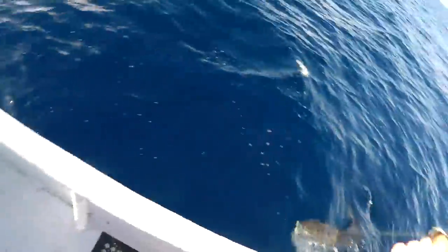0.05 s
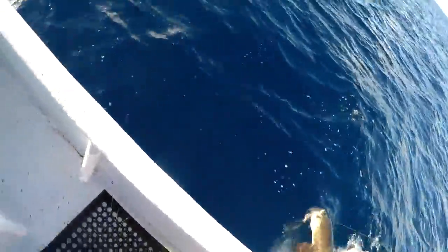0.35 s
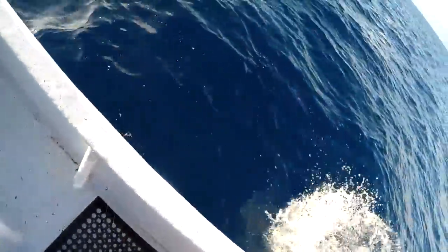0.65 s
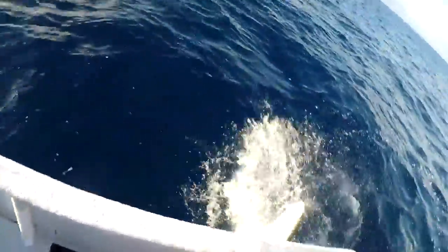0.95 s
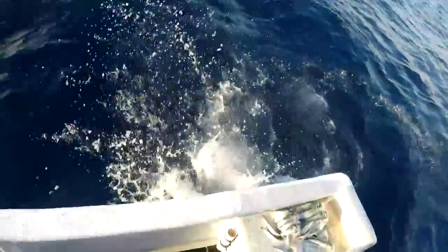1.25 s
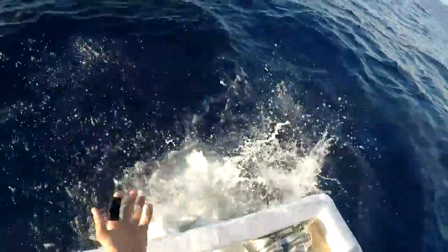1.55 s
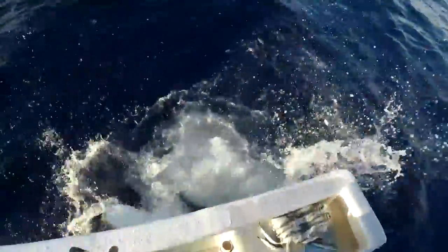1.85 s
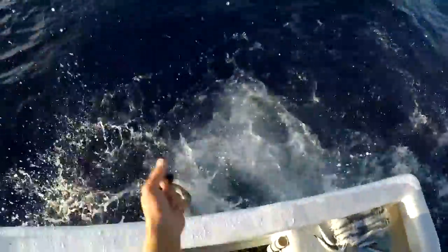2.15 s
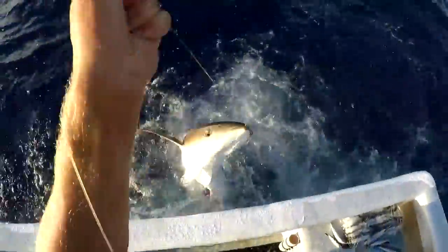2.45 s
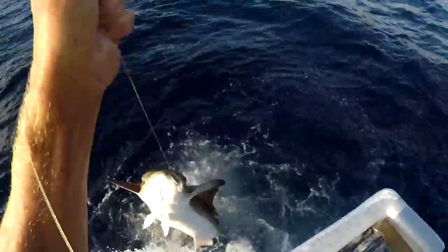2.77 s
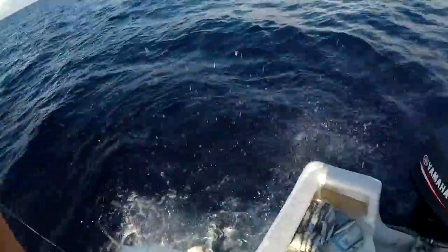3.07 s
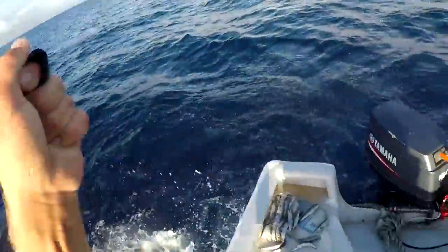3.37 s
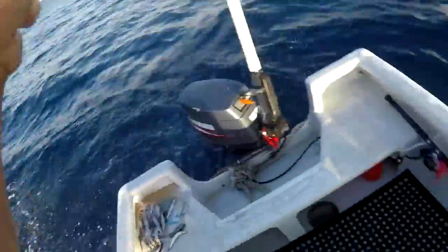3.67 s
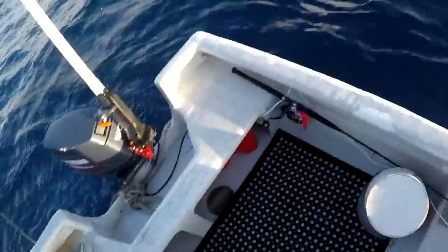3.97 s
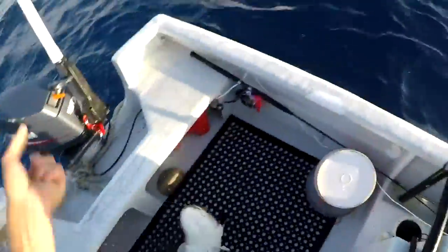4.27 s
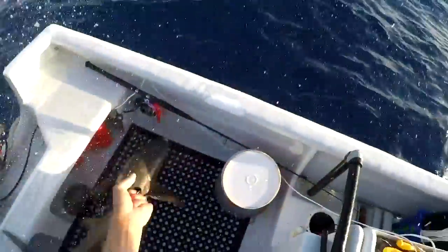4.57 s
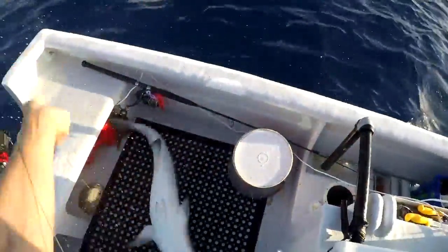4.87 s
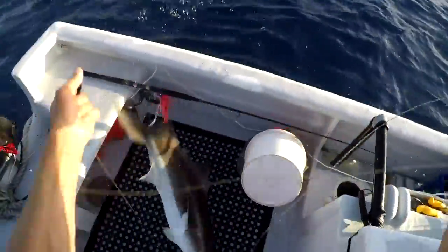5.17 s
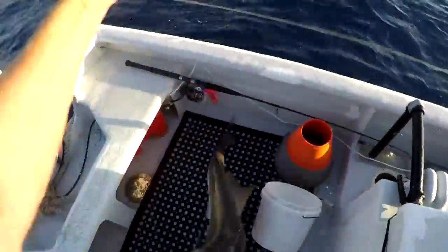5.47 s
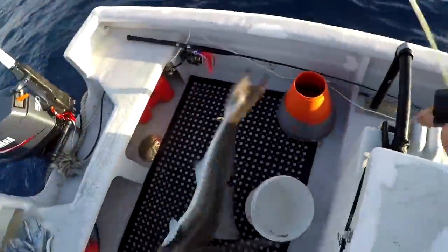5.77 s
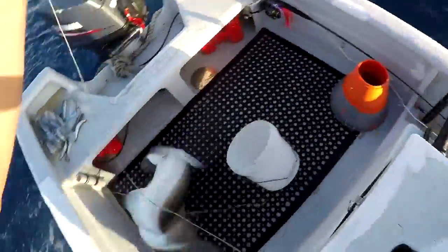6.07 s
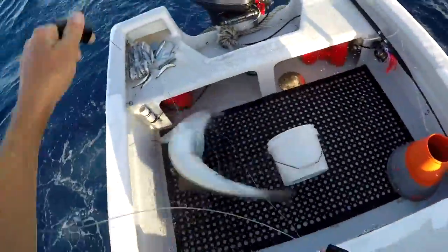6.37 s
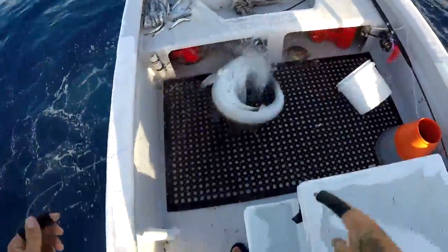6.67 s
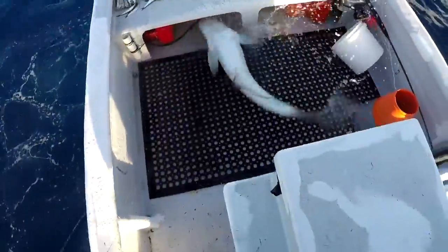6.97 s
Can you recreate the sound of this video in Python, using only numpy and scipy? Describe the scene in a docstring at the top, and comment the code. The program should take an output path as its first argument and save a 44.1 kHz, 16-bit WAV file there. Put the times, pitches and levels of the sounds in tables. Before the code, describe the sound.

Water splashes beside a boat, then a small shark thrashes on deck with wet slaps and hollow thumps as wind buffets the microphone.

```python
"""A small shark on a hand line thrashes the sea white beside a drifting boat: foam sloshes, spray rains
back. About four seconds in it is swung over the side and beats its wet body and tail on the rubber mat,
booming the hollow deck. It knocks a plastic bucket over, its skin drags and squeaks, and the heaviest
blow lands near the end. All of it is heard from inside a ringing waterproof camera case, with wind and
movement buffeting the microphone throughout."""
import sys
import numpy as np
from scipy import signal
from scipy.fft import rfft, irfft, next_fast_len
from scipy.io import wavfile
from scipy.ndimage import uniform_filter1d

SR = 44100
rng = np.random.default_rng(int(sys.argv[2]) if len(sys.argv) > 2 else 0)


def generate_wav(sig):
    """Save sig (samples, or channels by samples) to the path in sys.argv[1] as 16-bit PCM at SR."""
    pcm = np.round(np.clip(np.atleast_2d(sig).T, -1, 1) * 32767).astype(np.int16)
    wavfile.write(sys.argv[1], SR, pcm)


N = 318666
TIME = np.arange(N) / SR

# wet body on water, hull and mat: (time [s], rise [s], base t60 [s], level [dB], brightness [dB/band])
BODY_SLAPS = [(0.287, 0.00073, 0.087, -38, -4.5), (2.69, 0.0089, 0.23, -40, 3),
              (3.094, .005, 0.29, -47.5, 9), (3.262, 0.011, 0.065, -43, 1), (3.299, 0.014, 0.074, -37, 3),
              (3.484, 0.0027, 0.048, -42.5, 5), (3.515, 0.0021, 0.045, -40.5, -0.5),
              (4.172, 0.00082, 0.037, -32, 11.5), (4.2, 0.011, 0.23, -37, 9),
              (4.425, 0.0015, 0.013, -36.5, 8), (4.473, 0.0013, 0.015, -26.5, 2.5),
              (4.484, 0.0019, 0.025, -33, 4), (4.651, 0.019, 0.065, -26.5, 7.5),
              (4.665, 0.0025, 0.088, -28, -1.5), (4.743, 0.0063, 0.11, -28, 2),
              (4.776, 0.012, 0.073, -20.5, 1.5), (4.917, 0.0047, 0.05, -18, 2.5),
              (4.935, 0.011, 0.16, -18, 0), (5.034, 0.0084, 0.24, -21, -1.5),
              (5.062, 0.011, 0.097, -23.5, -8), (5.175, 0.017, 0.099, -20, 1.5),
              (5.238, 0.0046, 0.088, -26, -1.5), (5.301, 0.0012, 0.19, -34, 4),
              (5.354, 0.017, 0.073, -28, 9.5), (5.456, 0.0034, 0.1, -24, 2.5),
              (5.639, 0.009, 0.088, -19.5, 2), (5.725, 0.013, 0.13, -23, 1),
              (5.763, 0.0034, 0.082, -33, -4.5), (5.789, 0.0036, 0.06, -32.5, 2),
              (5.860, 0.0033, 0.15, -35, 4.5), (6.1175, 0.003, 0.096, -23.5, -8),
              (6.195, 0.011, 0.078, -38, -6.5), (6.272, .003, 0.79, -31, 2),
              (6.314, 0.0051, 0.12, -18, 0.5), (6.438, 0.01, 0.32, -26, 0),
              (6.597, 0.011, 0.16, -31.5, 3.5), (6.644, 0.0037, 0.29, -25.5, 2.5),
              (6.72, 0.007, 0.071, -27.5, -4.5), (6.873, 0.0047, 0.074, -29, 4),
              (6.934, 0.0061, 0.076, -19.5, 0), (7.023, 0.0095, 0.1, -32.5, 6),
              (7.054, 0.00076, 0.037, -22, -4.5), (7.071, 0.004, 0.1, -19, 1)]
# dull thumps of water and body on the boat: (time [s], rise [s], base t60 [s], level [dB])
HULL_THUMPS = [(0.068, 0.026, 0.031, -49.5), (0.802, 0.0038, 0.069, -44.5), (1.111, 0.0085, 0.048, -45),
               (1.600, 0.014, 0.1, -39), (1.667, 0.0021, 0.033, -41), (2.016, 0.0043, 0.47, -42.5),
               (3.728, 0.0098, 0.44, -49.5), (3.863, 0.0083, 0.36, -46.5), (4.132, 0.022, 0.15, -40),
               (4.178, .001, 0.28, -37.5), (4.212, 0.0078, 0.16, -36), (4.268, 0.0015, 0.072, -35.5),
               (4.875, .005, 0.022, -44), (5.139, .006, 0.039, -41), (5.888, .002, .04, -46),
               (6.008, 0.0024, 0.036, -45), (7.037, 0.0018, 0.026, -38)]
# rough skin dragging over gunwale and mat: (time [s], length [s], level [dB])
SKIN_SLIDES = [(2.824, 0.11, -47), (4.279, 0.09, -35), (5.385, 0.055, -30.5), (5.485, 0.04, -32.5),
               (5.595, 0.08, -36.5), (6.477, 0.045, -32), (6.9, 0.079, -34), (7.185, .06, -27)]
# band mix of each kind of contact: (thud [dB], smack [dB], splat [dB], spray [dB])
SLAP_MIX = [-13.5, -3.5, -1, -13.5]
THUMP_MIX = [7.5, 2, -19, -19]
SLIDE_MIX = [-7.5, -6.5, -3.5, -11.5]
def contact_powers(t60_scales=(1.15, 1.0, .95, .9)):
    """Power envelopes of slaps, thumps and slides in four bands; brightness tilts about the splat."""
    powers, tilt = np.zeros((4, N)), np.arange(4) - 2
    blows = [(s, rise, t60, db + np.array(SLAP_MIX) + bright * tilt)
             for s, rise, t60, db, bright in BODY_SLAPS]
    blows += [(s, rise, t60, db + np.array(THUMP_MIX)) for s, rise, t60, db in HULL_THUMPS]
    for s, rise, t60, levels_db in blows:
        span, age = window(s, SR // 2)
        for k, db in enumerate(levels_db):
            powers[k, span] += from_db(db) ** 2 * slap_power(age, rise, t60 * t60_scales[k])
    dragging = sum(from_db(db) * swell(s, length, attack=0.013, t60=0.072)
                   for s, length, db in SKIN_SLIDES)
    return powers + np.outer(from_db(SLIDE_MIX), dragging) ** 2


def slap_power(age, rise, t60, snap_t60=0.012, patter_db=-23, patter_t60=0.17):
    """A snap at first contact, a swell as the body lands, a quick decay, then thrown water's patter."""
    since_contact = age - min(rise / 2, .003)
    snap = 0.071 * (since_contact > 0) * from_db(-60 * np.abs(since_contact) / snap_t60) ** 2
    softness = 1 + (rise / 0.0027) ** 2   # slow landings snap less
    attack = np.minimum(age / rise, 1) ** 2
    since_peak = np.maximum(age - rise, 0)
    body = from_db(-60 * since_peak / t60) ** 2
    patter = from_db(patter_db - 60 * since_peak / patter_t60) ** 2
    return attack * (body + patter) + snap / softness


# the five edges around the thud, smack, splat and spray bands: (frequency [Hz])
BAND_EDGES = [400, 900, 2400, 5500, 15000]
# EQ of a wet slap: (frequency [Hz], gain [dB])
SLAP_EQ = [(200, 35.5), (350, 3.5), (600, -10), (1100, -6.5), (2300, -7), (3600, 2.5), (5000, -10.5),
           (6200, -17), (8000, -13), (9500, -22.5), (13000, -27), (15500, -29)]
def slaps(ragged_db=3.5, echo_gain=.35):
    """Skin meets the wet surface patch by patch: a dense burst of tiny cracks, treble dying first."""
    texture = coloured(drops(per_s=5000, spread_db=3.0), SLAP_EQ)
    ragged = from_db(ragged_db * drift(350))
    lag = np.zeros(N, int)   # each slap lands at its own distance from the boat's side
    for (s, *_), echo_s in zip(BODY_SLAPS, rng.uniform(.0006, .0035, len(BODY_SLAPS))):
        lag[int(s * SR):] = int(echo_s * SR)
    texture = texture + echo_gain * texture[np.arange(N) - lag]
    return ragged * sum(np.sqrt(power) * evened(band(texture, *BAND_EDGES[k:k + 2], order=4), size=400)
                        for k, power in enumerate(contact_powers()))


# bright accents in and between the slaps: (time [s], level [dB])
WET_CRACKS = [(4.473, -40), (4.944, -19), (5.042, -17.5), (5.076, -16), (5.647, -15.5), (5.697, -35),
              (5.737, -14.5), (5.765, -25), (6.121, -22.5), (6.290, -20), (6.318, -22), (6.457, -25),
              (6.646, -19.5), (6.726, -35), (7.037, -23.5)]
def cracks(rise_s=0.00061):
    """Trapped water bursts out under the body, or a fin flicks the mat, with a sharp crack."""
    bursts = sum(from_db(db) * swell(s, rise_s, rise_s, t60=0.026) for s, db in WET_CRACKS)
    return bursts * evened(band(rng.standard_normal(N), 1100, 4440), size=200)


# air cupped under some slaps: (time [s], pitch [Hz], level [dB])
AIR_POCKETS = [(.287, 3780, -39), (4.215, 2070, -27), (4.779, 1190, -21.5), (4.939, 1344, -22),
               (4.945, 2934, -17.5), (5.038, 2170, -11.5), (5.068, 1580, -34), (6.121, 1713, -22),
               (6.122, 1110, -21)]
def air_pockets(attack_s=0.002, t60=0.11, sag_octaves_per_s=0.43):
    """A pocket of air under the wet body rings unsteadily, sagging a little as it opens."""
    out, wobble = np.zeros(N), 0.49 * drift(300)
    for s, hz, db in AIR_POCKETS:
        span, age = window(s, SR // 5)
        pitch = hz * 2 ** (-sag_octaves_per_s * age) + 100 * wobble[span]
        envelope = np.minimum(age / attack_s, 1) * from_db(db - 60 * age / t60)
        out[span] += envelope * np.exp(wobble[span]) * sine(pitch)
    return out


# hard, hollow knocks on the boat: (time [s], level [dB], pitch [Hz])
HULL_KNOCKS = [(0.933, -12, 780), (4.143, -12, 640), (4.150, -15, 696), (4.178, -8.5, 880),
               (4.266, -8, 835), (4.273, -9, 610), (5.0007, -11.5, 900), (7.0615, -5, 810)]
def knocks(ring_t60=0.0077, click_db=-11, click_t60=0.0035):
    """A hard contact gives a short click and a few cycles of hollow ring."""
    out = np.zeros(N)
    for s, db, hz in HULL_KNOCKS:
        span, age = window(s, SR // 20)
        noise = band(rng.standard_normal(len(age)), 820, 2500)
        click = noise / rms(noise) * from_db(click_db - 60 * age / click_t60)
        tone = np.sin(2 * np.pi * hz * age) * from_db(-60 * age / ring_t60)
        out[span] += from_db(db) * (tone + click)
    return out


# the body's weight landing on the deck: (time [s], level [dB], panel pitch [Hz])
DECK_HITS = [(4.181, -19.5, 169), (4.186, -21, 114), (4.208, -25.5, 270), (4.228, -25, 335),
             (4.671, -25, 200), (4.744, -33, 500), (4.762, -34, 585), (5.039, -17.5, 170),
             (5.071, -27, 460), (5.074, -20, 151), (5.634, -20, 144), (5.644, -22, 276),
             (5.736, -27.5, 406), (6.124, -24.5, 356), (6.319, -25, 430), (6.321, -18, 224),
             (6.457, -29, 313), (6.511, -23, 303), (6.615, -31, 249), (6.661, -26.5, 246),
             (7.038, -36, 160), (7.064, -13, 108)]
# modes of a deck panel: (pitch [x panel pitch], level [dB], t60 [s])
PANEL_MODES = [(1, 2, 0.11), (1.181, -6, 0.16), (1.57, -4, .06)]
def deck():
    """The hollow deck booms at the pitch of the panel that is hit."""
    return sum(struck([(s, db)], [(hz * ratio, *rest) for ratio, *rest in PANEL_MODES])
               for s, db, hz in DECK_HITS)


# hits on the bucket: (time [s], level [dB])
BUCKET_HITS = [(5.243, -25.5), (6.725, -40)]
# modes of its plastic shell: (pitch [Hz], level [dB], t60 [s])
BUCKET_MODES = [(213, 2.5, 0.25), (1014, 5.5, 0.085), (1147, 3.5, 0.088), (1610, -12, 0.17)]
def bucket():
    """The empty bucket rings as it is knocked over, then swept aside by the tail."""
    return struck(BUCKET_HITS, BUCKET_MODES)


# wet skin on rubber: (time [s], length [s], starting pitch [Hz], level [dB])
SKIN_SQUEAKS = [(5.929, 0.09, 1367, -45), (7.164, 0.044, 2186, -24)]
def squeaks(width_hz=520, octaves_per_s=7.7):
    """Skin sticks and slips unevenly, ever faster as the body pushes off: a hoarse, rising scrape."""
    out = np.zeros(N)
    for s, length, first_hz, db in SKIN_SQUEAKS:
        hz = first_hz * 2 ** (octaves_per_s * np.clip(TIME - s, 0, length))
        grip = evened(band(rng.standard_normal(N), 24, width_hz / 2, order=1), size=2000)
        out += from_db(db) * swell(s, length, attack=0.013, t60=0.045) * grip * sine(hz)
    return out


# faders for churned and running water: (time [s], slosh [dB], fizz [dB])
WATER_FADERS = [(.18, -57, -78), (.24, -56, -55), (.45, -48.5, -52), (.9, -46.5, -44), (2.3, -47, -44),
                (2.85, -53.5, -50.5), (3.1, -54.5, -51.5), (3.45, -52.5, -51.5), (3.7, -52, -65.5),
                (4.35, -53.5, -46), (4.6, -47, -60), (4.88, -49, -45), (5.15, -44, -42), (5.55, -42, -59),
                (5.95, -51, -47), (6.25, -52, -53.5), (6.8, -47.5, -41.5), (7.23, -45, -36.5)]
# fader for the finest spray of the first splash: (time [s], level [dB])
MIST_FADER = [(.3, -81), (.85, -57), (1.1, -71), (2.3, -80), (3.05, -67), (3.7, -79)]
# sheets of spray falling back on the sea: (peak time [s], level [dB])
SPRAY_SURGES = [(.88, -41.5), (1.0, -45), (1.24, -38), (1.61, -37.5), (1.9, -43.5), (2.19, -40.5)]
# EQs of slosh and fizz: (frequency [Hz], gain [dB])
SLOSH_EQ = [(130, 5), (250, 1.5), (450, -0.5), (900, 2), (1700, -0.5), (2500, -2), (4000, -5.5)]
FIZZ_EQ = [(1200, -8), (2200, -13.5), (3600, -1.5), (5000, -9.5), (6700, -18.5), (7800, -12), (9500, -19),
           (13000, -28.5), (15500, -34)]
def water(bubble_db=-8, fizz_trim_db=-2.5, surge_rise_s=0.13, waver_db=1.06):
    """Foam sloshes and bubbles while spray rains back in surges of drops and fizz, mist on top."""
    slosh_db, fizz_db = automation(WATER_FADERS)
    mist_db, = automation(MIST_FADER)
    slosh = coloured(rng.standard_normal(N), SLOSH_EQ)
    slosh += from_db(bubble_db) * bubbles(per_s=490, cycles=20, low_hz=450, high_hz=2760, pitches=18)
    spray = drops(per_s=9000, spread_db=4.0) * from_db(2.5 * drift(140))
    spray += bubbles(per_s=3500, cycles=18, low_hz=2500, high_hz=15000, pitches=30)
    surge_power = sum((from_db(db) * swell(s - surge_rise_s, surge_rise_s, surge_rise_s, t60=0.32)) ** 2
                      for s, db in SPRAY_SURGES)
    fizz_gain = from_db(fizz_trim_db) * np.sqrt(from_db(fizz_db) ** 2 + surge_power)
    fizz = fizz_gain * coloured(spray, FIZZ_EQ)
    mist = band(spray, 7200, 8400)
    mix = from_db(slosh_db) * slosh + fizz + from_db(mist_db) * mist / rms(mist)
    return mix * from_db(waver_db * drift(14))


def bubbles(per_s, cycles, low_hz, high_hz, pitches):
    """Small bubbles ring for some cycles each, at scattered pitches; rms 1."""
    births, pitch_index = drops(per_s, spread_db=4.0), rng.integers(0, pitches, N)
    out = sum(ring(births * (pitch_index == k), hz, cycles / hz)
              for k, hz in enumerate(np.geomspace(low_hz, high_hz, pitches)))
    return out / rms(out)


# low thumps from wind, handling and blows on the boat: (time [s], level [dB], pitch dive depth [Hz])
DIVING_THUMPS = [(.097, -15, 330), (.456, -11.5, 380), (0.531, -18.5, 343), (0.565, -21.5, 360),
                 (0.66, -14.5, 342), (0.737, -14, 317), (0.858, -16, 280), (0.932, -13.5, 330),
                 (1.047, -21.5, 300), (1.256, -21.5, 250), (1.75, -15, 420), (1.769, -15.5, 383),
                 (1.827, -19, 322), (2.388, -13, 480), (2.777, -16, 390), (2.919, -21, 310),
                 (2.993, -22, 330), (3.184, -20, 383), (3.302, -20.5, 418), (3.63, -18, 525),
                 (3.774, -23, 370), (4.034, -16, 500), (4.149, -10, 397), (4.178, -11, 466),
                 (4.229, -12, 500), (4.275, -14, 420), (4.361, -16, 480), (4.479, -17.5, 480),
                 (4.587, -16.5, 517), (4.999, -6.5, 686), (5.372, -13.5, 450), (5.488, -22, 500),
                 (6.829, -8.5, 600), (7.039, -6.5, 250), (7.06, 3.5, 830), (7.091, -9, 483)]
def diving_thumps(swing_db=8.5, dive_s=0.0071, rise_s=0.0046, cycles=3.38, snap_db=-16, snap_t60=0.026):
    """A low thump dives in pitch, grows and dies in a few cycles; high-starting ones snap at the core."""
    swings, snaps = np.zeros((2, N))
    ragged = np.exp(0.53 * drift(700))
    for s, db, dive_hz in DIVING_THUMPS:
        span, age = window(s, SR // 10)
        floor_hz = 42.6 + 0.059 * dive_hz
        hz = floor_hz + dive_hz * ragged[span] / (1 + age / dive_s) ** 3
        tilt_db = -5.5 * np.log2(hz / floor_hz)   # the swing grows as it slows
        decay_db = -60 * age * floor_hz / cycles
        attack = np.sqrt(np.minimum(age / rise_s, 1))
        swings[span] -= from_db(db + swing_db + tilt_db + decay_db) * attack * sine(hz)
        from_snap = np.abs(age - 0.0035)   # the dull snap peaks just after the onset
        snaps[span] += from_db(db + snap_db - 60 * from_snap / snap_t60) * dive_hz / 1090
    return swings + snaps * evened(band(rng.standard_normal(N), 516, 1090), size=150)


# fader for the breeze's rumble between gusts: (time [s], level [dB])
BREEZE_FADER = [(0, -17.5), (.35, -23.5), (.6, -15), (1.15, -26.5), (2.3, -27.5), (2.65, -27.5),
                (3.25, -18), (3.7, -22), (4.1, -16.5), (4.8, -21.5), (5.3, -34), (5.8, -23), (6.25, -29.5)]
# gusts of rumble: (peak time [s], width [s], level [dB])
WIND_GUSTS = [(0.941, 0.018, -9.5), (1.37, 0.33, -18), (1.731, 0.19, -20), (2.074, 0.14, -13),
              (2.38, 0.088, -20), (2.792, 0.036, -15.5), (2.95, 0.05, -18.5), (3.545, 0.065, -9.5),
              (4.169, 0.045, -9), (4.999, 0.054, -15), (5.074, 0.097, -14.5), (5.388, 0.53, -16),
              (5.662, 0.05, -11), (5.991, 0.097, -15.5), (7.083, 0.051, -13.5), (7.22, 0.056, -21)]
# fader for the low flutter of wind and of the body moving on deck: (time [s], level [dB])
FLUTTER_FADER = [(0, -35), (.3, -56), (.55, -38), (1.1, -50), (1.45, -41.5), (2.05, -40), (2.25, -51),
                 (2.6, -46), (3.2, -47), (3.95, -32), (4.3, -43), (4.55, -33), (5.3, -32.5), (5.7, -29),
                 (6.1, -41.5), (6.35, -37), (7.23, -34.5)]
# EQ of wind on the case: (frequency [Hz], gain [dB])
WIND_EQ = [(14, 3.5), (22, -5.5), (32, 0), (50, -6), (75, -12.5), (110, -22), (170, -27.5), (300, -32)]
def wind(flutter_trim_db=-2, rumble_swing_db=4.5, flutter_swing_db=4.0):
    """Breeze and gusts roll over the case in a deep rumble; a low flutter rides each of its lumps."""
    breeze_db, = automation(BREEZE_FADER)
    flutter_db, = automation(FLUTTER_FADER)
    gust_power = sum(from_db(db) ** 2 / (1 + (2 * (TIME - s) / width) ** 2) ** 3
                     for s, width, db in WIND_GUSTS)
    waver = drift(16)
    rumble_gain = np.sqrt(from_db(breeze_db + rumble_swing_db * waver) ** 2 + 2 * gust_power)
    flutter_gain = from_db(flutter_db + flutter_trim_db + flutter_swing_db * waver)
    rumble_noise, flutter_noise = (coloured(white, WIND_EQ) for white in rng.standard_normal((2, N)))
    rumble = evened(band(rumble_noise, 13.4, 85.0), size=4000)
    lumps = np.abs(signal.hilbert(rumble, next_fast_len(N)))[:N] / np.sqrt(2)
    flutter = lumps * evened(band(flutter_noise, 82.3, 298, order=2), size=3000)
    return rumble_gain * rumble + flutter_gain * flutter


# peaks and notches of the camera case: (frequency [Hz], width [Hz], gain [dB])
CASE_EQ = [(1758, 194, 5.5), (2180, 113, -7), (2460, 99, 0.5), (2956, 90, 4.5), (3186, 125, -6),
           (3430, 120, 5), (3895, 86, 3.5), (4163, 54, -19), (4440, 160, 1.5), (4816, 250, 6),
           (6450, 210, 3.5), (7630, 550, 1.5)]
def camera_case(x):
    """The shell rings at some pitches and swallows others."""
    for hz, width_hz, db in CASE_EQ:
        gain, width = from_db(db / 2), np.pi * width_hz / SR
        tuning = -2 * np.cos(2 * np.pi * hz / SR)
        x = signal.lfilter([1 + width * gain, tuning, 1 - width * gain],
                           [1 + width / gain, tuning, 1 - width / gain], x)
    return x


def struck(hits, modes, scatter_db=1.5):
    """Hits ring a set of modes, each hit with a slightly different balance."""
    times, hit_db = np.transpose(hits)
    strengths_db = hit_db[:, None] + rng.normal(0, scatter_db, (len(hits), len(modes)))
    out = np.zeros(N)
    for k, (hz, db, t60) in enumerate(modes):
        clicks = np.zeros(N)
        clicks[(times * SR).astype(int)] = from_db(db + strengths_db[:, k])
        out += (-1) ** k * ring(clicks, hz, t60)
    return out


def ring(clicks, hz, t60):
    """A unit click sets a sine of height 1 ringing."""
    decay, step = from_db(-60 / (t60 * SR)), 2 * np.pi * hz / SR
    return signal.lfilter([0, np.sin(step)], [1, -2 * decay * np.cos(step), decay ** 2], clicks + 1e-18)


def drops(per_s, spread_db):
    """Random droplet impacts, many small and a few large; rms 1."""
    sizes = from_db(spread_db * np.minimum(rng.exponential(1, N), 5)) * rng.choice([-1, 1], N)
    clicks = sizes * (rng.random(N) < per_s / SR)
    return clicks / rms(clicks)


def coloured(x, eq):
    """A texture through an EQ curve that rolls off beyond its ends; rms 1."""
    hz, db = np.transpose(eq)
    size = next_fast_len(N)
    bins_hz = np.maximum(np.arange(size // 2 + 1) * SR / size, 1)
    rolloff = np.minimum(bins_hz / hz[0], 1) ** 2 * np.minimum(hz[-1] / bins_hz, 1) ** 2
    gain = from_db(np.interp(np.log(bins_hz), np.log(hz), db))
    shaped = irfft(rfft(x, size) * rolloff * gain, size)[:N]
    return shaped / rms(shaped)


def band(x, low_hz, high_hz, order=3):
    """Causal band-pass."""
    sos = signal.butter(order, [low_hz, min(high_hz, .45 * SR)], "band", fs=SR, output="sos")
    return signal.sosfilt(sos, x + 1e-18)


def evened(x, size):
    """A texture held at rms 1 over stretches of size samples."""
    return x / np.sqrt(np.abs(uniform_filter1d(x ** 2, size=size)) + 1e-12)


def swell(start, length, attack, t60):
    """Attack, hold, release."""
    age = TIME - start
    return np.clip(age / attack, 0, 1) * from_db(-60 * np.clip(age - length, 0, 3 * t60) / t60)


def drift(per_s):
    """A random modulator gliding between values of spread 1."""
    knots = rng.standard_normal(4000)
    return np.interp(TIME * per_s, np.arange(len(knots)), knots)


def automation(rows):
    """Each fader of a table, sample by sample."""
    times, *faders = np.transpose(rows)
    return [np.interp(TIME, times, fader) for fader in faders]


def window(start_s, size):
    """An event's slice of the timeline, and its age in seconds."""
    start = int(start_s * SR)
    age = TIME[:min(size, N - start)]
    return slice(start, start + len(age)), age


def sine(hz):
    """A sine following a pitch curve."""
    return np.sin(2 * np.pi * np.cumsum(hz) / SR)


def from_db(db):
    """Decibels to gain."""
    return 10 ** (np.asarray(db) / 20)


def rms(x):
    """Root mean square."""
    return np.sqrt(np.mean(x ** 2) + 1e-20)


def scene():
    """Shark, boat and water ring through the case; the wind and diving thumps bypass its EQ."""
    boat = slaps() + cracks() + air_pockets() + knocks() + deck() + bucket() + squeaks() + water()
    return (camera_case(boat) + wind() + diving_thumps())[None]


def record(dry, ceiling=.92, cutoff_hz=15700):
    """The largest swings overload softly, and the highest treble is cut."""
    limited = dry / (1 + (dry / ceiling) ** 8) ** (1 / 8)
    return signal.sosfilt(signal.ellip(10, .2, 80, cutoff_hz, fs=SR, output="sos"), limited)


dry = scene()
out = record(dry)
generate_wav(out)
```